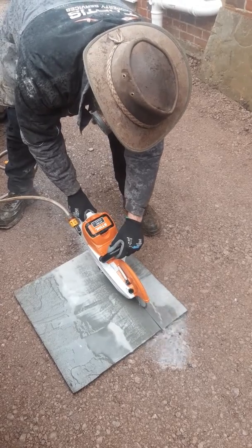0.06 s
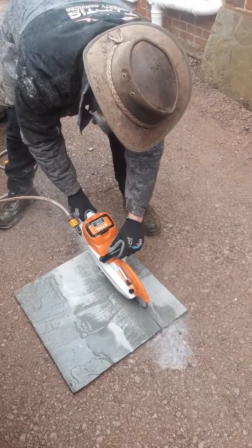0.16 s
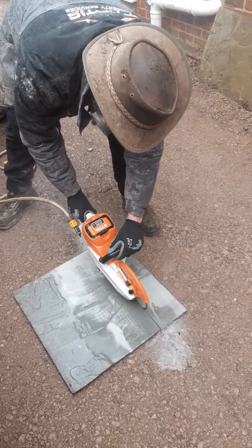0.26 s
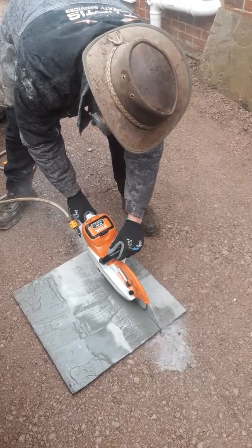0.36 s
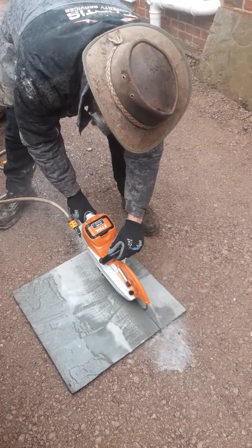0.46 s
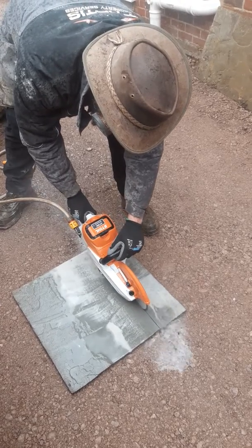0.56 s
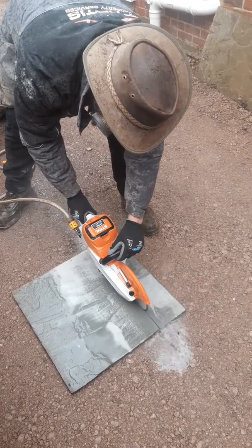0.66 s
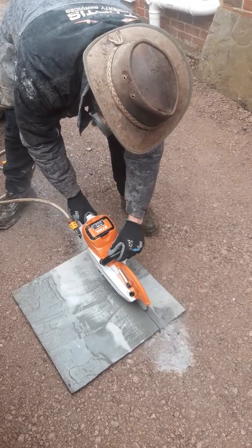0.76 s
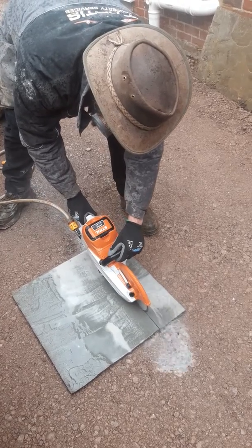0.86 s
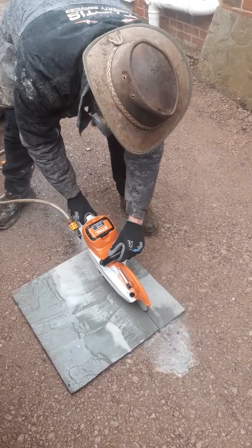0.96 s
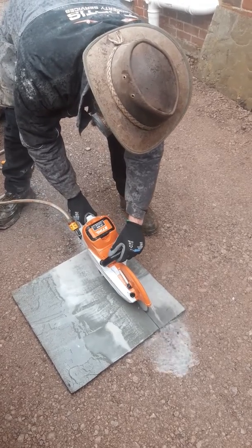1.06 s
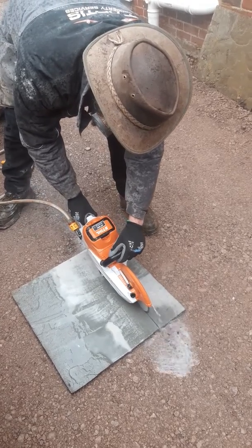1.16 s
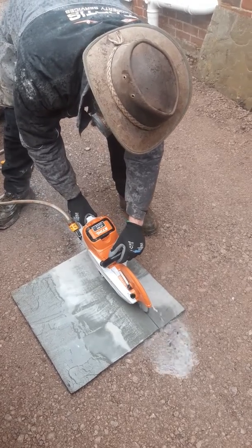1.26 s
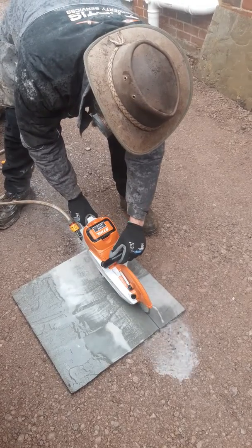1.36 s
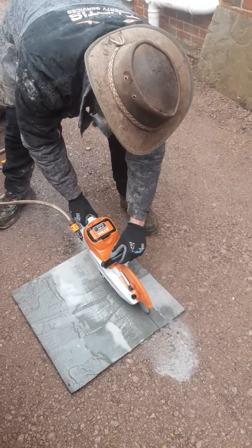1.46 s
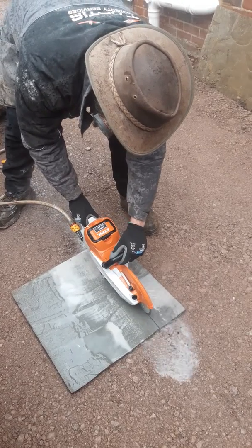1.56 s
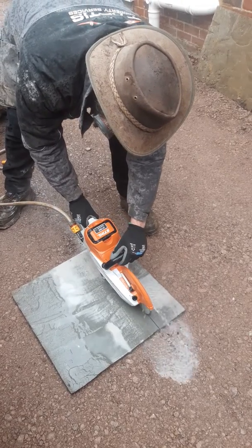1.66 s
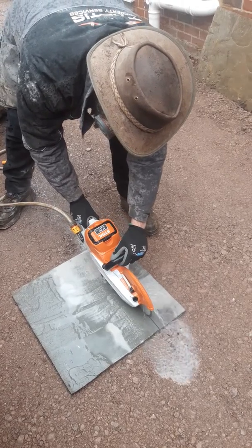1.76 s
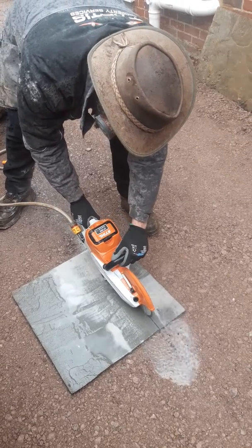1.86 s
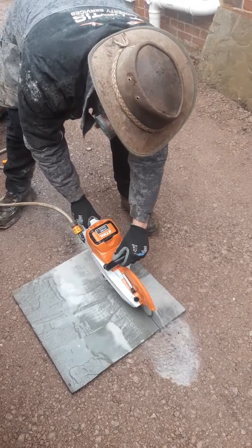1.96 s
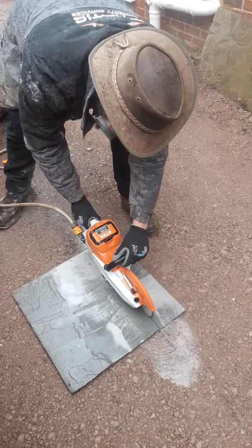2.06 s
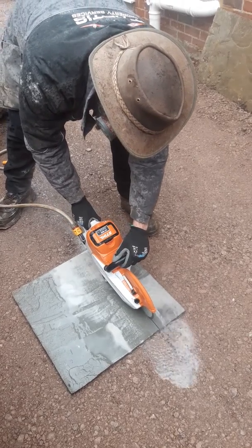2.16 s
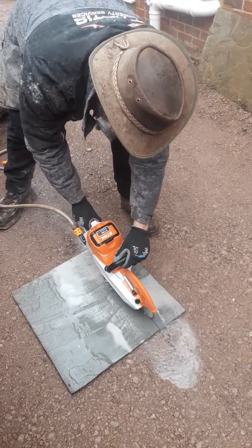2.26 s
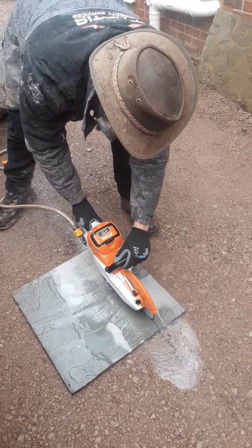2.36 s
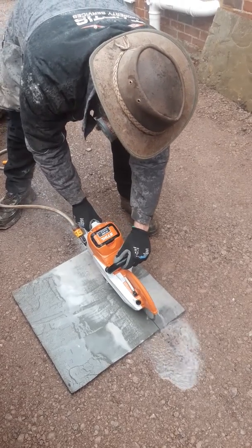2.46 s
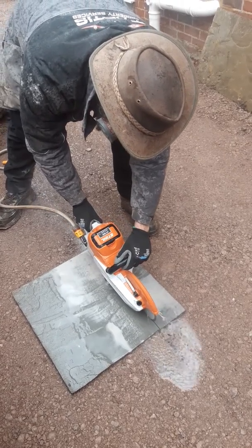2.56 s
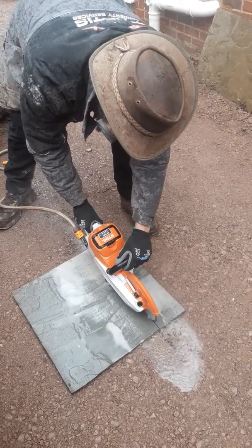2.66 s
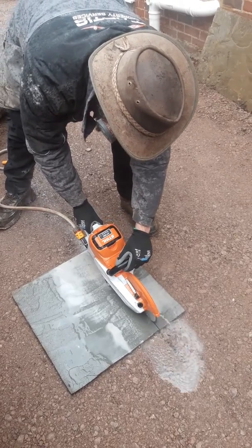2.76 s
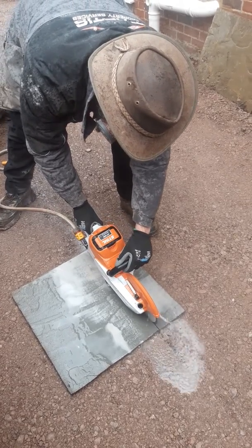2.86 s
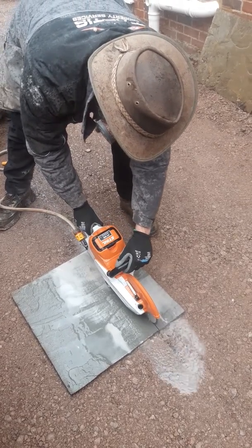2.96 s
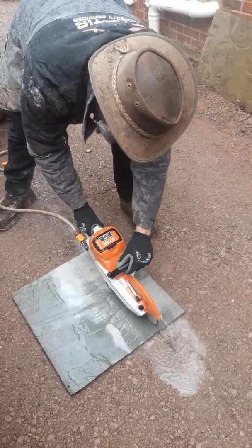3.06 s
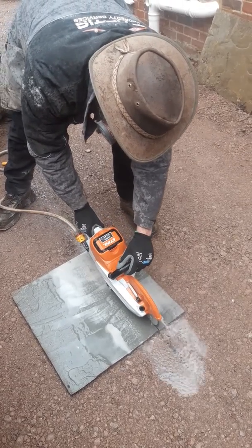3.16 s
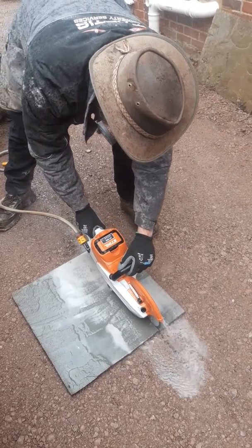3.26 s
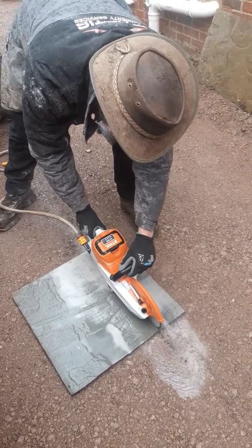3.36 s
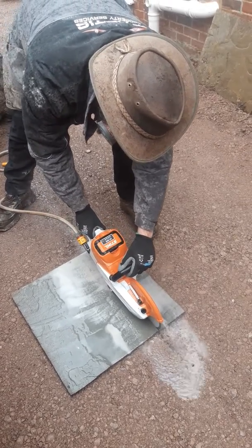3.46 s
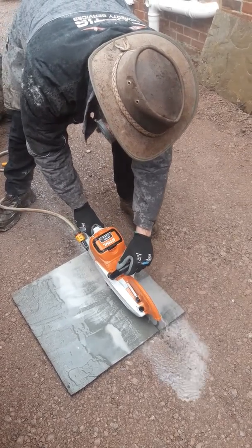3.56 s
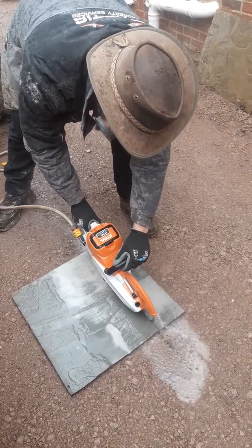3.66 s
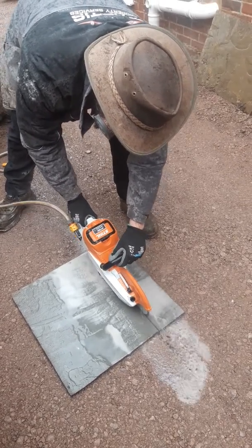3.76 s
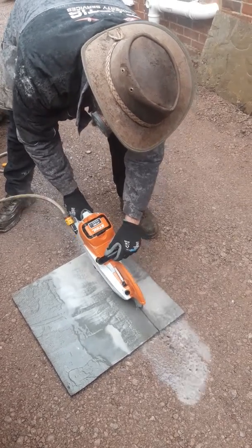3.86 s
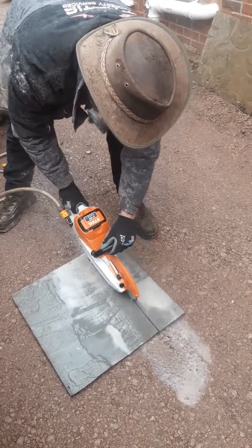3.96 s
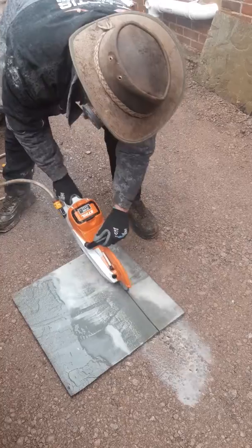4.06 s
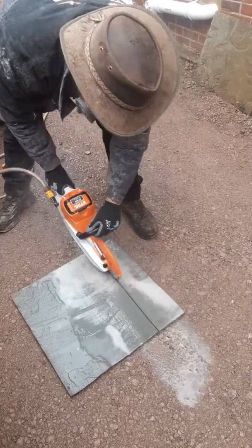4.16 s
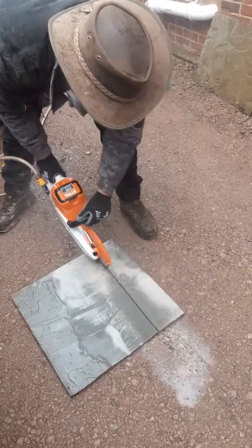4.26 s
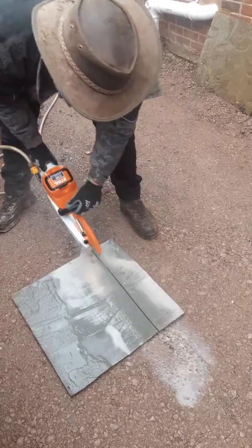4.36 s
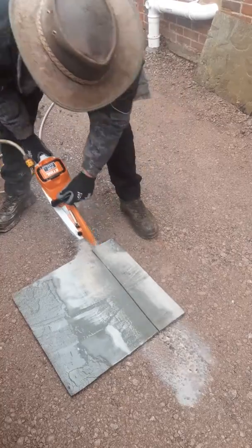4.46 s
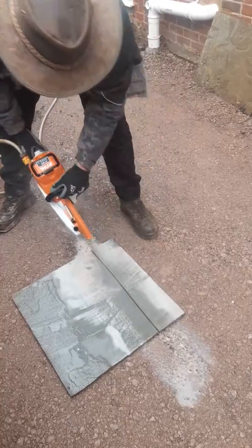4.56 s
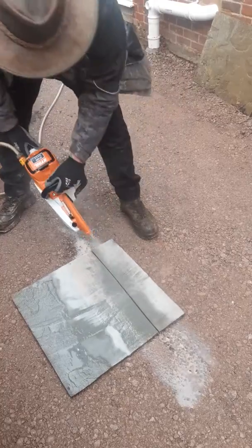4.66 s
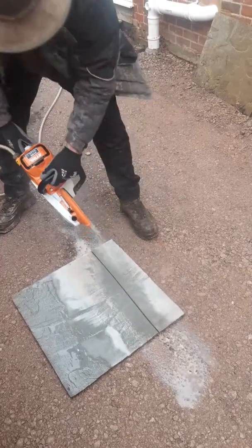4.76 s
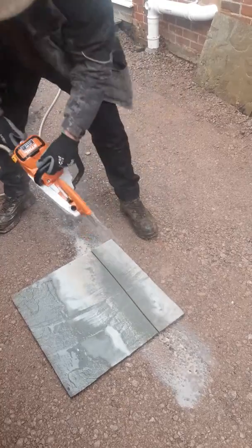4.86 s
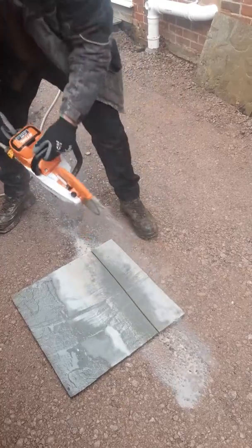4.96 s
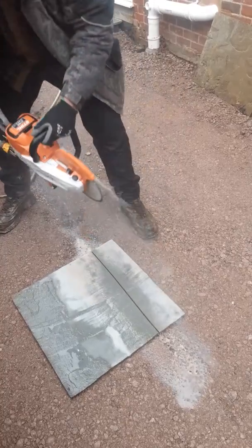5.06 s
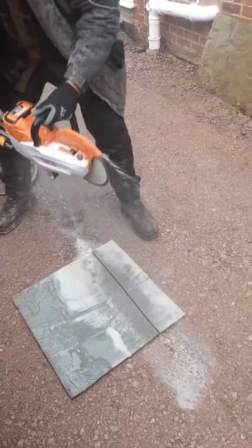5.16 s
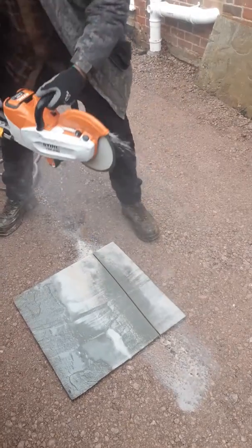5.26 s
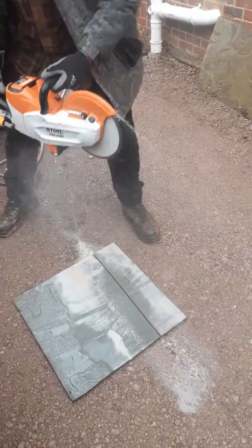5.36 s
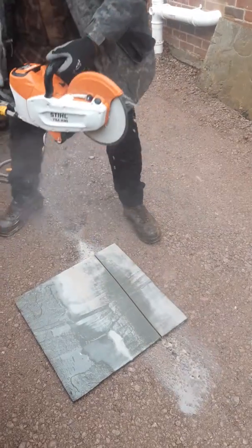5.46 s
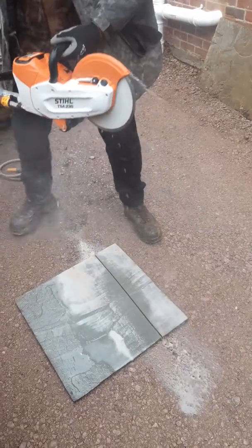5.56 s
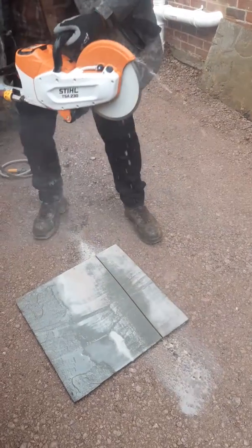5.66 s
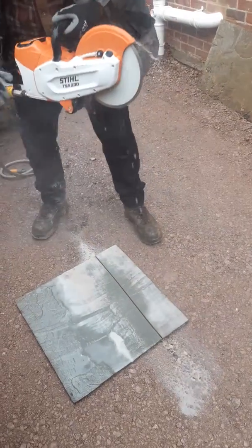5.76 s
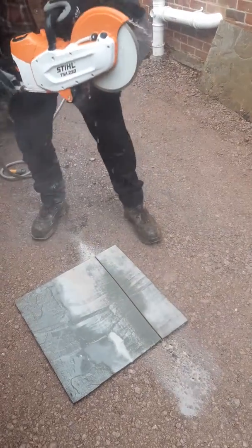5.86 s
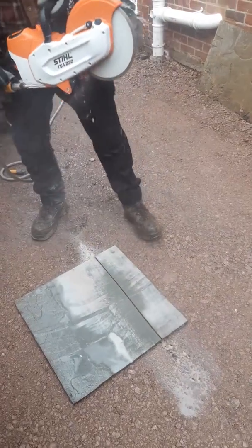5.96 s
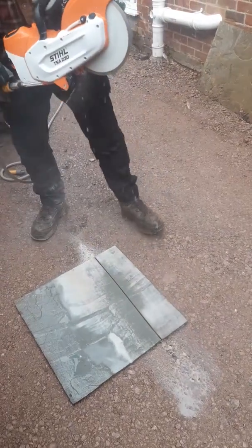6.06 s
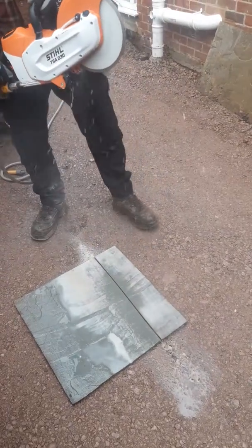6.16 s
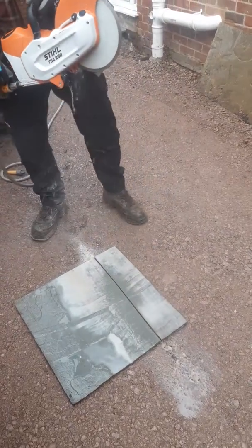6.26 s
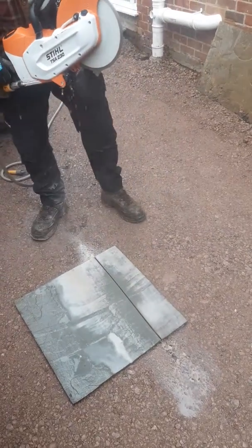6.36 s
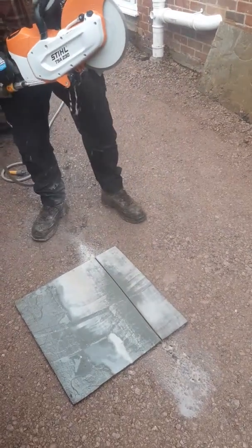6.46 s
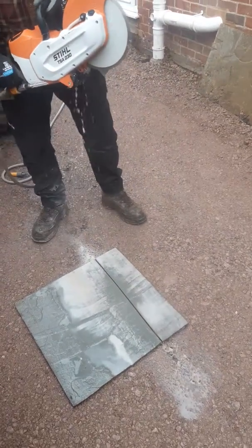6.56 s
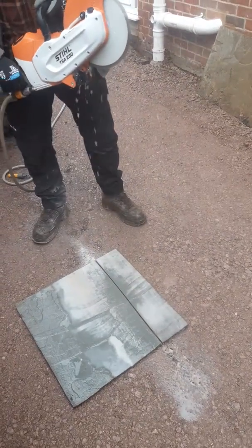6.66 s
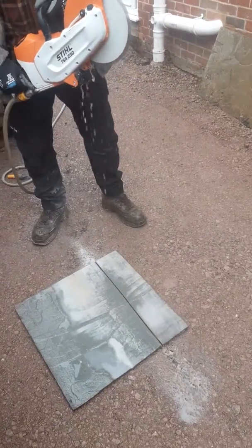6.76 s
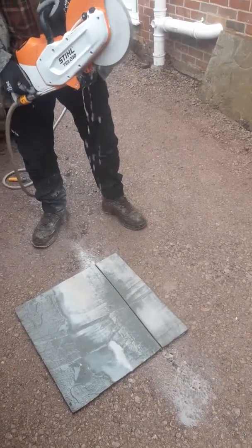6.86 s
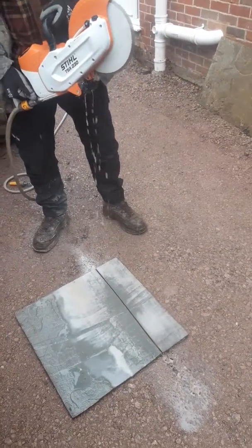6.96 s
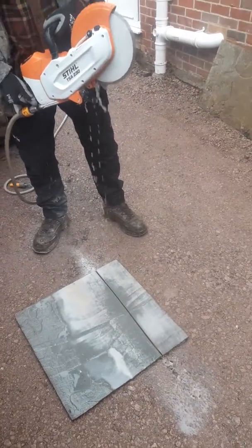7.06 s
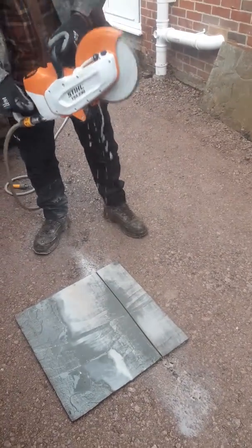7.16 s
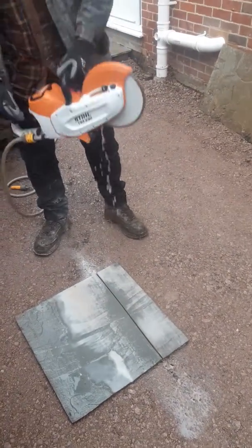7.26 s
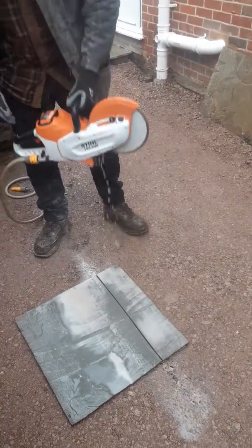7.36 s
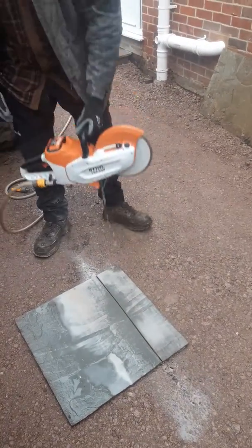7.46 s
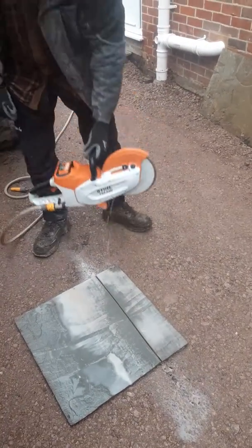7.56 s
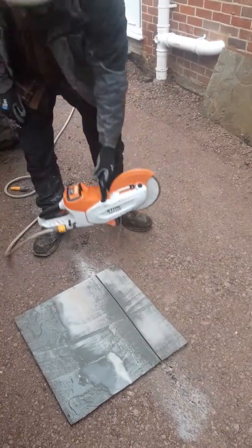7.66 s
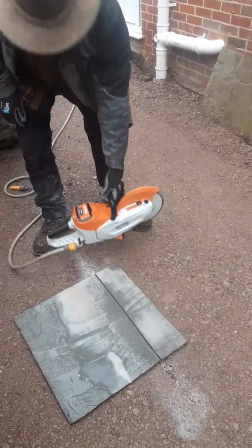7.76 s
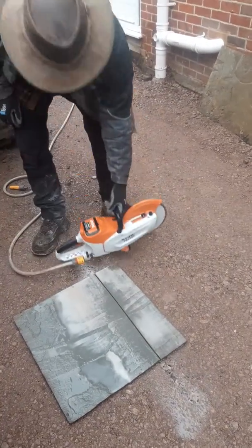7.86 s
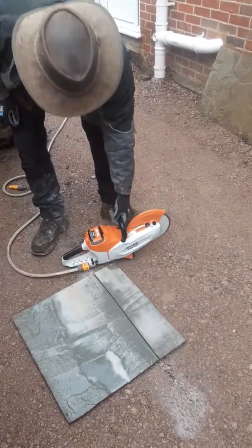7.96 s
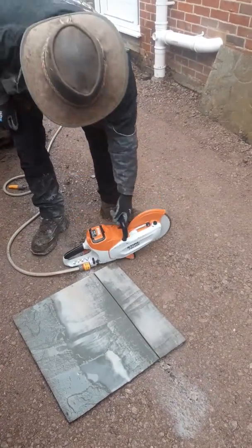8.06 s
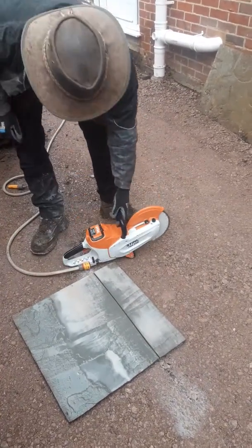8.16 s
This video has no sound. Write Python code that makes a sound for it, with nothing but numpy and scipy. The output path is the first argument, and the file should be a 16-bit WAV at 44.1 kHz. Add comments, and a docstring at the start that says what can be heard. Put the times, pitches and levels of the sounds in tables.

```python
"""Outdoors in a yard by a house wall, two close microphone ports face a battery cut-off saw wet-cutting stone.
Diamonds on the rim grind off chips (shaped grains) and make the steel blade squeal (noise-driven modes).
The blade leaves the cut and rings on (decaying sines); the motor whines down (gliding harmonics).
Cooling water hisses off the disc, then drips (shaped noise); the frame knocks on gritty ground.
Gusts buffet the microphone, and its gain creeps back up after the loud cut."""
import sys
import numpy as np
from scipy import signal
from scipy.fft import rfft, irfft, next_fast_len
from scipy.io import wavfile
from scipy.ndimage import uniform_filter1d, minimum_filter1d, map_coordinates

SR = 44100
rng = np.random.default_rng(int(sys.argv[2]) if len(sys.argv) > 2 else 0)


def unload_audio(sound):
    """Save the sound as a 16-bit wav file, at the path given as the first command line argument."""
    columns = np.transpose(np.atleast_2d(sound))
    # keep every value between -1 and 1, then stretch to whole-number steps
    steps = np.round(np.clip(columns, -1, 1) * 32767)
    wavfile.write(sys.argv[1], SR, steps.astype(np.int16))


N = 362502
TIME = np.arange(N) / SR
TOP_HZ = 15900  # band limit
RELEASE_S = 4.325  # the moment the blade comes free of the stone, in seconds


def amp(db):
    """Decibels to gain."""
    return 10 ** (np.asarray(db) / 20)


def unit(x):
    """Scale to rms 1."""
    return x / np.sqrt(np.mean(np.abs(x) ** 2) + 1e-20)


def along(points, hz):
    """Read (Hz, value) points on a log frequency axis."""
    f, v = np.transpose(points)
    return np.interp(np.log(hz + 1), np.log(f + 1), v)


def wobble(rate):
    """A smooth random curve with rate knots a second."""
    knots = rng.standard_normal(int(N * rate / SR) + 4)
    return map_coordinates(knots, [TIME * rate])


def swell(middle, length):
    """A smooth rise and fall, length seconds wide at half height."""
    return 2 ** -((2 * (TIME - middle) / length) ** 2)


def decay(start, rise, t60):
    """The envelope of one blow: a quick rise, then a fall of 60 dB in t60 seconds."""
    age = np.maximum(TIME - start, 0)
    return (1 - np.exp(-age / max(rise, 1e-4))) * np.exp(-np.log(1000) * age / t60)


def filtered(x, response):
    """x times a complex response of frequency."""
    size = next_fast_len(N + 8192)
    return irfft(rfft(x, size) * response(np.fft.rfftfreq(size, 1 / SR)), size)[..., :N]


def coloured(x, spectrum):
    """x shaped by a spectrum, at rms 1."""
    return unit(filtered(x, lambda hz: amp(along(spectrum, hz))))


def noise(spectrum):
    """Smooth noise of rms 1."""
    return coloured(rng.standard_normal(N), spectrum)


def grains(rate, spread_db):
    """Tiny impacts, rate a second, at random moments with clipped log-normal sizes; rms 1."""
    hit = rng.random(N) < rate / SR
    size = amp(spread_db * np.clip(rng.standard_normal(N), -2, 2))
    return unit(hit * size * rng.choice([-1, 1], N))


def spatter(rate, spread_db, life_s):
    """The envelope of many tiny bursts, each sharp at the start, its energy fading over life_s; rms 1."""
    strikes = grains(rate, spread_db) ** 2
    energy = signal.lfilter([1], [1, -np.exp(-1 / (life_s * SR))], strikes)
    return unit(np.sqrt(np.abs(energy)))


def ringing(modes, width_hz):
    """Narrow resonances kept ringing by random excitation; rms 1."""
    def response(hz):
        power = sum(amp(db) ** 2 / (1 + ((hz - f) / width_hz) ** 2) ** 2 for f, db in modes)
        return np.sqrt(power)
    return unit(filtered(rng.standard_normal(N), response))


def bent(x, detune):
    """x with all its frequencies shifted by the changing share detune."""
    return map_coordinates(x, [np.arange(N) + np.cumsum(detune)], order=5, mode="mirror")


def knock(events, push_s, ring_hz=84, t60=0.041):
    """One short push for each (s, dB) event, with a low, quickly damped rebound."""
    pushes = sum(amp(db) * np.exp(-np.abs(TIME - s) / push_s) for s, db in events)
    width_hz = np.log(1000) / (np.pi * t60)
    return filtered(pushes, lambda hz: hz ** 2 / (ring_hz ** 2 - hz ** 2 + 1j * hz * width_hz))


# The spectrum of the yard. Each row: frequency in Hz, relative level in dB.
YARD_SPECTRUM = [(28, -25), (60, 15.5), (130, 3), (290, 7.5), (450, -2), (950, 3), (3000, -11.5),
                 (8000, -50)]
# The spectrum of wind on the microphone. Each row: frequency in Hz, relative level in dB.
WIND_SPECTRUM = [(24, -25), (65, 5.5), (230, -8.5), (1200, -64)]
# Gusts on the microphone. Each row: start in seconds, level in dB, t60 in seconds.
GUSTS = [(4.67, -24.5, 0.76), (5.96, -35.5, 0.53), (6.685, -26, 0.89), (7.77, -38.5, 0.71)]


def air(yard_db=-44, buffet_db=0, rise=0.0081):
    """The yard's steady noise, and soft low gusts on the microphone."""
    gusts = sum(amp(db) * decay(s, rise, t60) for s, db, t60 in GUSTS)
    return amp(yard_db) * noise(YARD_SPECTRUM) + amp(buffet_db) * gusts * noise(WIND_SPECTRUM)


# Single eddies at the microphone. Each row: time in seconds, push in dB.
EDDIES = [(4.545, -15.5), (4.73, -14), (6.696, -22), (6.711, -14.5), (6.739, -18), (6.758, -23),
          (6.815, -16), (6.885, -22), (6.951, -24), (8.206, -19)]


def thumps():
    """Single eddies strike the microphone: short pushes with a low rebound."""
    return knock(EDDIES, push_s=0.0014)


# Water swishing, also heard in slurry and water. Each row: frequency in Hz, relative level in dB.
SWISH_SPECTRUM = [(900, -21), (1500, -5), (2300, -8.5), (2850, 1), (3400, -3), (5200, -0.5), (8500, -18.5),
                  (15800, -10.5)]
# Fine mist, also heard in slurry, water and drips. Each row: frequency in Hz, relative level in dB.
MIST_SPECTRUM = [(2000, -27), (5000, -7), (8500, -22.5), (10700, -4.5), (13000, 0), (15800, -13.5)]


def hose(swish_db=-57, mist_db=-56):
    """The water feed keeps hissing softly: two steady noises."""
    return amp(swish_db) * noise(SWISH_SPECTRUM) + amp(mist_db) * noise(MIST_SPECTRUM)


# The disc's low modes, stirred by the water jet. Each row: frequency in Hz, relative level in dB.
LOW_MODES = [(480, 2), (575, 10), (1360, 8), (1540, -1), (1790, 8)]


def hum(level_db=-45, t60=6.5):
    """The free disc's low modes hum faintly and fade slowly."""
    return amp(level_db) * decay(RELEASE_S, .002, t60) * ringing(LOW_MODES, width_hz=18)


# The saw's frame touching the ground. Each row: start in seconds, level in dB, t60 of the grit in seconds.
TOUCHDOWNS = [(7.684, -31, .025), (7.909, -33, 0.0068), (8.036, -24.5, 0.13)]
# The frame's modes. Each row: frequency in Hz, relative level in dB, t60 in seconds.
FRAME_MODES = [(1380, 10.5, 0.017), (2760, -13, .1), (10260, -27, .12)]
# The frame slides a little as it settles. The row: middle in seconds, length in seconds, level in dB.
SLIDE = (8.18, 0.085, -42)


def set_down(ring_db=-7, crunch_db=0):
    """The frame knocks and scrapes on the gritty ground: ringing modes and a noisy contact."""
    ring = sum(
        amp(db + level) * decay(s, 0.00044, t60) * np.sin(2 * np.pi * (hz * TIME + rng.random()))
        for s, db, _ in TOUCHDOWNS for hz, level, t60 in FRAME_MODES)
    grit = noise([(100, -2), (1400, -4.0), (2000, -12), (5000, -9.0), (8000, -21), (12000, -12)])
    middle, length, slide_db = SLIDE
    contact = sum(amp(db) * decay(s, 0.00032, t60) for s, db, t60 in TOUCHDOWNS)
    contact = contact + amp(slide_db) * swell(middle, length)
    return amp(ring_db) * ring + amp(crunch_db) * grit * contact


# The biggest drops landing on the ground. Each row: start in seconds, relative level in dB.
DROPS = [(7.0783, -26), (7.215, -25.5), (7.414, -35), (7.459, -17.5), (7.4734, -23), (7.549, -18),
         (7.5934, -23), (7.8344, -26)]


def drips(level_db=-5.0, t60=0.026, patter_db=-49.0):
    """Water runs off the slowing blade and spatters on the ground in short bursts of noise."""
    drops = sum(amp(db) * decay(s, 0.00099, t60) for s, db in DROPS) * noise(MIST_SPECTRUM)
    running = np.interp(TIME, [6.6, 7.0, 7.7, 8.1], [0, 1, 1, 0])
    patter = running * spatter(rate=110, spread_db=8.0, life_s=0.0021) * noise(MIST_SPECTRUM)
    return amp(level_db) * drops + amp(patter_db) * patter


# The braking motor. Each row: time in seconds, pitch in Hz.
MOTOR_PITCH = [(4.325, 3070), (6.0, 1445), (6.3, 1075), (6.45, 887.5), (6.75, 594), (7.43, 1)]


def motor_hz():
    """The pitch of the motor: steady until the blade is free, then falling."""
    return np.interp(TIME, *np.transpose(MOTOR_PITCH))


def spinning(knee_hz):
    """Near 1 at speed, dying away quickly once the motor falls below knee_hz."""
    return 1 / (1 + (knee_hz / motor_hz()) ** 4)


# The motor's first three harmonics, in order: relative level in dB.
HARMONICS_DB = [-3, -7.5, -4]
# What the housing radiates. Each row: frequency in Hz, relative level in dB.
HOUSING_BAND = [(600, -26), (770, 1.5), (1170, -5.5), (1280, 3), (2050, 5.5), (2450, -0.5), (2950, 3),
                (3500, -16)]


def motor(level_db=-37.5, knee_hz=365, flutter_db=4.0, jitter=0.61):
    """The whine falls as the rotor slows; each harmonic swells as it crosses the housing's band."""
    pitch_hz = motor_hz()
    phase = 2 * np.pi * np.cumsum(pitch_hz) / SR
    whine = 0
    for k, db in enumerate(HARMONICS_DB, 1):
        audible = k * pitch_hz < TOP_HZ
        level = amp(db + along(HOUSING_BAND, k * pitch_hz) + flutter_db * wobble(70))
        whine = whine + audible * level * np.sin(k * phase + np.sqrt(k) * jitter * wobble(130))
    return amp(level_db) * spinning(knee_hz) * whine


# The slowed disc's modes, struck by water. Each row: frequency in Hz, relative level in dB.
SLOW_BLADE_MODES = [(3430, -3), (3880, 0.5), (4060, -3), (4300, 0), (4475, 1.5), (4850, -3), (5070, 0),
                    (5360, -2.5)]
# Water caught by the spinning disc. Each row: start in seconds, level in dB, t60 in seconds.
SPLASHES = [(5.55, -33, 0.81), (5.638, -21.5, 0.41), (6.137, -16, 0.25), (6.162, -19.5, 0.57),
            (6.245, -24, 0.76), (6.523, -8, 0.2), (6.597, -19.5, 0.26), (6.631, -27, 0.55),
            (6.797, -23, .02), (6.814, -16.5, 0.036), (6.84, -25, 0.12)]
# Thicker spurts that set the slowing disc rattling. Each row: middle in seconds, level in dB.
SPURTS = [(6.642, -30), (6.693, -40), (6.755, -36), (6.85, -48)]
# The spectrum of the spray. Each row: frequency in Hz, relative level in dB.
SPRAY_SPECTRUM = [(1200, -19), (3200, -6), (5200, -9), (8300, -13), (10600, 3.5), (13000, 0.5),
                  (15800, -12)]


def water(swish_db=-37, mist_db=-44, knee_hz=560, ring_db=-6, splash_db=0, rise=0.0017,
          sputter_db=2.0, ring_t60=0.083, strike_db=-11, rattle_s=0.017):
    """Cooling water swishes round the guard and bursts into spray on the disc, which rings and flutters."""
    ring = ringing(SLOW_BLADE_MODES, width_hz=40)
    # swish and mist die away with the speed of the disc
    steady = amp(swish_db) * (noise(SWISH_SPECTRUM) + amp(ring_db) * ring)
    fine = amp(mist_db) * coloured(grains(rate=5000, spread_db=-3), MIST_SPECTRUM)
    bursts = np.sqrt(sum((amp(db) * decay(s, rise, t60)) ** 2 for s, db, t60 in SPLASHES))
    spray_level = amp(splash_db + 2.6 * wobble(220)) * bursts
    spray = spray_level * coloured(grains(rate=7400, spread_db=7.0), SPRAY_SPECTRUM)
    # the disc rings on for a few hundredths of a second after each burst
    keep = np.exp(-np.log(10 ** 6) / (ring_t60 * SR))
    ring_level = np.sqrt(signal.lfilter([1 - keep], [1, -keep], bursts ** 2))
    rattle = sum(amp(db) * swell(s, rattle_s) for s, db in SPURTS) * ring
    sputter = amp(sputter_db * wobble(55))
    struck = amp(strike_db) * ring_level * ring
    return spinning(knee_hz) * (steady + fine) + rattle + sputter * (spray + struck)


def slurry(swish_db=-11, mist_db=-11, rise=0.34, t60=2.3):
    """Clear of the slot, the disc flings off its coat of slurry in a fading hiss."""
    hiss = amp(swish_db) * noise(SWISH_SPECTRUM) + amp(mist_db) * noise(MIST_SPECTRUM)
    return decay(RELEASE_S, rise, t60) * hiss


# Brief falling squeaks. Each row: middle in seconds, frequency at the middle in Hz, level in dB.
SQUEAKS = [(4.755, 6350, -29), (5.984, 6760, -33.5)]


def squeaks(length=0.016, glide_hz=-1800):
    """Short high squeaks, each a swelling sine sliding by glide_hz a second."""
    def squeak(age, hz):
        phase = 2 * np.pi * (hz + .5 * glide_hz * age) * age
        return np.exp(-(age / length) ** 2) * np.sin(phase + .5 * wobble(150))
    return sum(amp(db) * squeak(TIME - s, hz) for s, hz, db in SQUEAKS)


# The free disc's modes. Each row: frequency in Hz, level in dB, t60 in seconds.
FREE_MODES = [(3770, -21.5, 1.7), (4120, -17, 1.3), (4274, -1, 0.34), (4480, -21, .8), (4500, -13.5, 0.7),
              (4530, -18, 1.8), (4690, -3, 0.49), (4750, -23, 2), (4935, -7, 0.32)]


def free_blade(rise=.015, sag=0.021):
    """Out of the stone, the disc rings on, some modes far longer than others, and all sag as it slows."""
    # the pitch falls by a share of 2 * sag a second
    slowing = TIME - sag * np.maximum(TIME - RELEASE_S, 0) ** 2
    return sum(
        amp(db + 3.8 * wobble(20)) * decay(RELEASE_S, rise, t60)
        * np.sin(2 * np.pi * hz * slowing + .5 * wobble(40))
        for hz, db, t60 in FREE_MODES)


# Breaking stone, also heard in grinding. Each row: frequency in Hz, relative level in dB.
STONE_SPECTRUM = [(20, -46), (45, -9), (75, 1.5), (160, -3), (330, 0), (700, -4), (2200, -7), (3600, -9),
                  (6000, -27.5)]
# Larger chips cracking off the stone. Each row: start in seconds, relative level in dB.
CHIPS = [(0.281, 0), (0.605, 1.5), (0.72, 0), (0.816, 4.5), (0.927, -2.5), (1.174, 0.5), (1.23, 3.5),
         (1.4, 4), (1.602, 0.5), (1.76, -0.5), (2.178, -0.5), (2.326, -2), (2.466, -1), (2.68, 2),
         (2.792, 5), (3.116, 0.5), (3.236, -1), (3.511, -2), (3.62, -1.5), (3.682, -0.5), (4.313, -3.5)]


def cracks(level_db=-1, t60=0.12, jolt_db=1.5):
    """A larger chip breaks away in a short, dry cluster of snaps and jolts the slab."""
    snapping = sum(amp(db) * decay(s, 0.00087, t60) for s, db in CHIPS)
    snaps = snapping * coloured(grains(rate=1400, spread_db=3.5), STONE_SPECTRUM)
    return amp(level_db) * snaps + amp(jolt_db) * knock(CHIPS, push_s=0.00048)


# The saw pushed harder into the stone. Each row: middle in seconds, length in seconds, extra level in dB.
PUSHES = [(0.24, 0.24, 3.5), (1.297, 0.42, 5), (2.59, 0.58, 5.5), (3.12, 0.23, 6.5), (3.512, 0.4, 1.5),
          (3.887, 0.07, 12.5)]
BITE_DB = -9  # grinding level between pushes
# from the slab's far edge on, less and less of the rim is in the stone
EDGE_S, EDGE_DB_PER_S = 4.02, 22


def grinding(chips_db=-2, dust_db=-2, flakes_db=1, chatter_db=6.0):
    """Chips and coarser flakes crack off in uneven surges over a steady crunch, louder with each push."""
    level_db = BITE_DB + sum(db * swell(s, length) for s, length, db in PUSHES)
    level_db = level_db - EDGE_DB_PER_S * np.maximum(TIME - EDGE_S, 0)
    chips = amp(chips_db) * grains(rate=480, spread_db=3.0) + amp(dust_db) * rng.standard_normal(N)
    flakes = np.hypot(1, amp(flakes_db) * spatter(rate=110, spread_db=0.0, life_s=0.0047))
    crunch = coloured(chips * flakes, STONE_SPECTRUM)
    # the bass comes in separate bumps
    bass = filtered(crunch, lambda hz: 1 / (1 + (hz / 520) ** 4))
    chatter = unit(amp(chatter_db * np.tanh(wobble(45))))
    in_stone = np.interp(TIME, [RELEASE_S, 4.365], [1, 0])
    return amp(level_db) * in_stone * (crunch - bass + chatter * bass)


# The stone pinches the blade, so the ringing modes change as the cut advances.
# Five sets, in order of the cut. Each row: frequency in Hz, relative level in dB.
ENTERING_MODES = [(4580, -32), (5060, -26), (5319, -31), (5566, -37), (5985, -29.5), (6065, -39),
                  (7294, -40), (10514, -34), (10826, -33), (13151, -36)]
DEEP_MODES = [(4565, -36.5), (5050, -35), (5300, -33), (5555, -37), (5975, -34.5), (6075, -31.5),
              (7101, -39.5), (10514, -36), (11203, -34), (13151, -36.5)]
NEAR_EDGE_MODES = [(4400, -35), (4640, -32.5), (5280, -37.5), (5960, -33), (6080, -30.5), (7200, -39),
                   (11230, -29), (12020, -34), (13520, -39)]
BREAKING_MODES = [(4995, -28), (5215, -30), (5675, -28), (6080, -30), (7130, -32.5), (11820, -32),
                  (13460, -34)]
LEAVING_MODES = [(4355, -29), (4963, -24.5), (5195, -27), (5665, -36), (5846, -27), (6150, -24.5),
                 (12220, -26), (13440, -31)]
# When each set takes over. Each row: time in seconds, blend in seconds, pitch change as a share per second.
STAGES = [(0, 0.29, -0.0035), (1.1, 0.44, -0.0011), (3.15, 0.22, -0.023), (3.73, 0.097, -0.016),
          (4.15, .04, 0.0049)]
# The rim's dense scrape. Each row: frequency in Hz, relative level in dB.
RASP_SPECTRUM = [(2500, -22), (4300, -3.5), (6100, -4), (6650, -8.5), (7300, -6.5), (8000, -13),
                 (9200, -13.5), (10400, -3.5), (11600, -2.5), (13500, -5), (15800, -18)]


def squeal(level_db=0.0, modes_db=-2.5, rasp_db=-1.5, wander=0.002527, fade_t60=0.26):
    """The rim scrapes in the slot: narrow, wavering blade modes over a dense rasp."""
    mode_sets = (ENTERING_MODES, DEEP_MODES, NEAR_EDGE_MODES, BREAKING_MODES, LEAVING_MODES)
    # each set of modes hands its energy to the next
    stage = sum(.5 + .5 * np.tanh((TIME - start) / blend) for start, blend, _ in STAGES[1:])
    load = wander * wobble(13)
    tones = 0
    for k, (modes, (start, _, glide)) in enumerate(zip(mode_sets, STAGES)):
        # changing load on the disc bends the modes, and each set glides at its own rate
        ring = bent(ringing(modes, width_hz=30.4), load + glide * (TIME - start))
        share = np.maximum(1 - np.abs(stage - k), 0)
        tones = tones + np.sqrt(share) * ring
    bite = amp(0.65 * wobble(24.95))
    contact = amp(level_db - 60 * np.maximum(TIME - RELEASE_S, 0) / fade_t60)
    return contact * bite * (amp(modes_db) * tones + amp(rasp_db) * noise(RASP_SPECTRUM))


# Lag of the left port behind the right. Each row: frequency in Hz, lag in radians.
PORT_LAG = [(3500, 0), (5000, 0.56), (15000, 1.82)]


def scene(scatter_db=-18):
    """All sources reach two close ports; the treble arrives at the left one slightly later."""
    direct = squeal() + grinding() + cracks() + free_blade() + hum() + motor() + squeaks()
    direct = direct + slurry() + water() + hose() + drips() + set_down() + air() + thumps()
    # the house wall scatters a little treble differently to each port
    age = np.arange(SR // 5) / SR
    wall = rng.standard_normal(len(age)) * amp(-60 * age / .25) * (age > .02)
    echo = signal.fftconvolve(direct, wall / np.linalg.norm(wall))[:N]
    scatter = amp(scatter_db) * filtered(echo, lambda hz: hz ** 3 / (hz ** 3 + 3500 ** 3))
    # added to one port and taken from the other, this turns their phases apart
    lag = filtered(direct, lambda hz: -1j * np.tan(np.clip(along(PORT_LAG, hz), 0, 2.5) / 2))
    side = scatter + lag
    return np.array([direct + side, direct - side])


def gain_control(x, ceiling_db=-13.0, hold_s=0.33, recover_db_per_s=8.5):
    """The gain drops to keep loud sound at the ceiling, holds, then creeps back up."""
    power = np.abs(uniform_filter1d(x ** 2, size=SR // 5))
    excess_db = np.maximum(10 * np.log10(power + 1e-12) - ceiling_db, 0)
    recovered_db = recover_db_per_s * TIME
    falling_db = np.maximum.accumulate(excess_db + recovered_db) - recovered_db
    held_db = np.interp(TIME - hold_s, TIME, falling_db)
    return amp(-np.maximum(falling_db, held_db))


def record(dry):
    """Slow gain control, then a fast limiter on both channels' peaks; nothing passes above the band limit."""
    levelled = dry * gain_control(dry.mean(axis=0))
    needed = 1 / np.maximum(np.abs(levelled).max(axis=0) / .95, 1)
    gain = uniform_filter1d(minimum_filter1d(needed, size=45), size=45)
    return filtered(levelled * gain, lambda hz: hz < TOP_HZ)


dry = scene()
out = record(dry)
unload_audio(out)
```